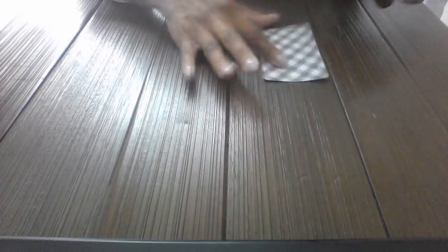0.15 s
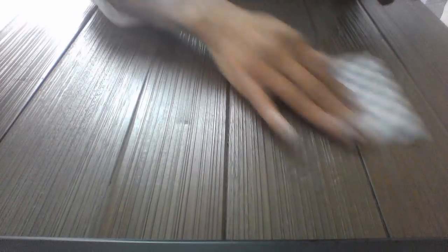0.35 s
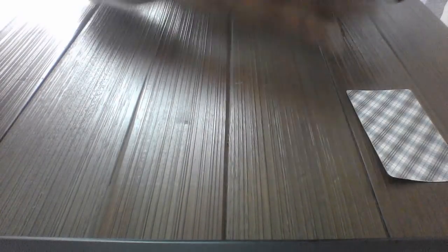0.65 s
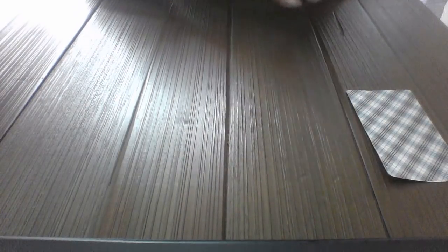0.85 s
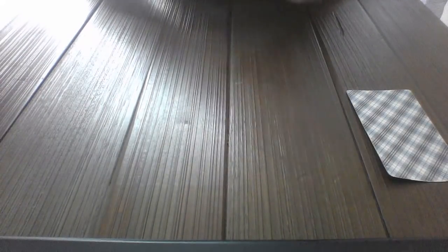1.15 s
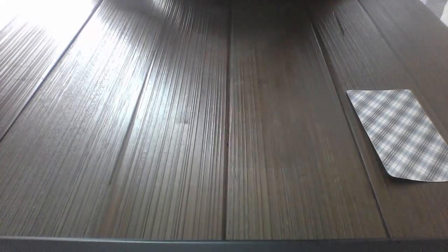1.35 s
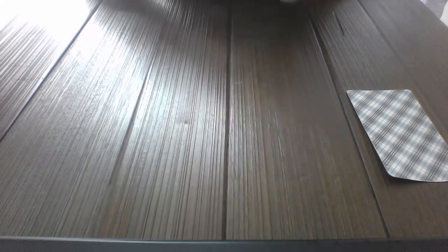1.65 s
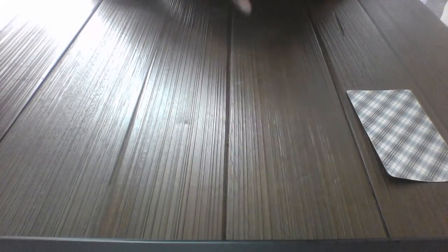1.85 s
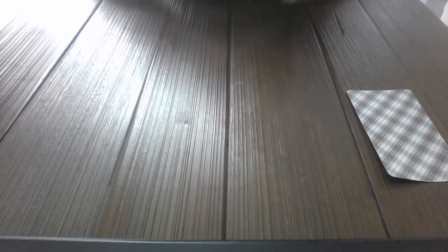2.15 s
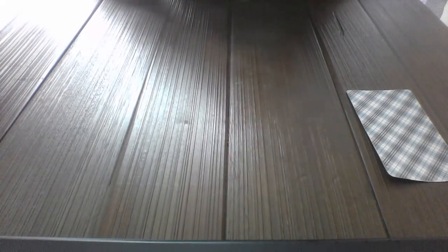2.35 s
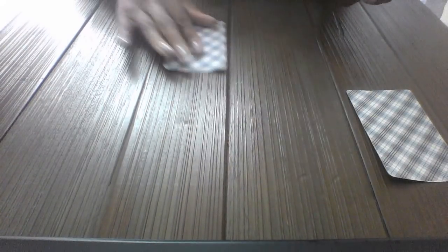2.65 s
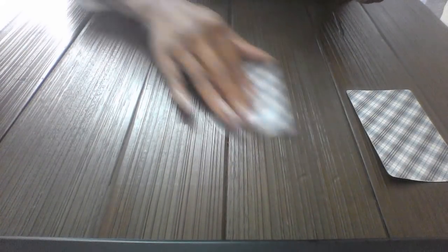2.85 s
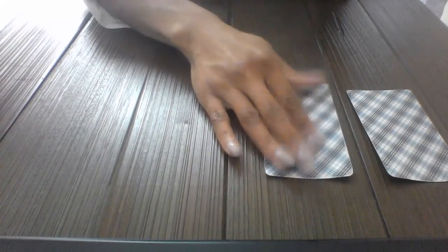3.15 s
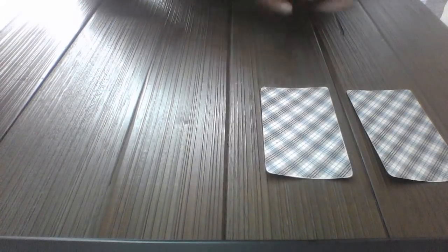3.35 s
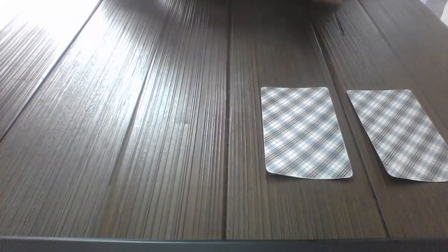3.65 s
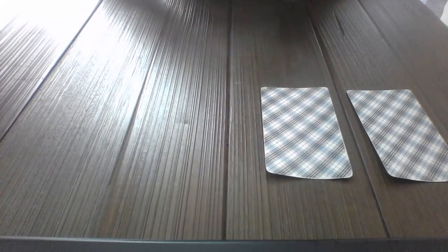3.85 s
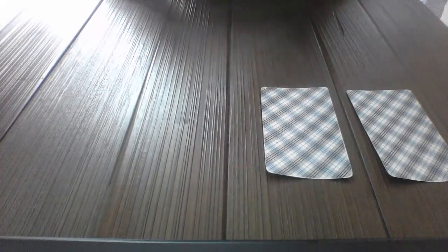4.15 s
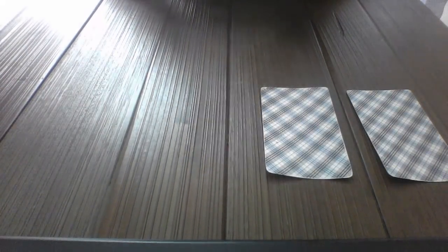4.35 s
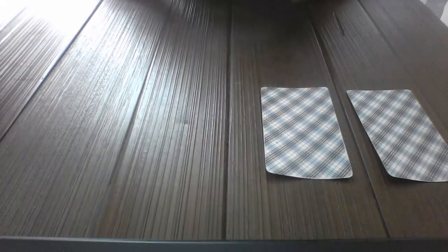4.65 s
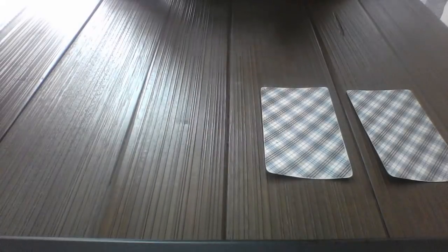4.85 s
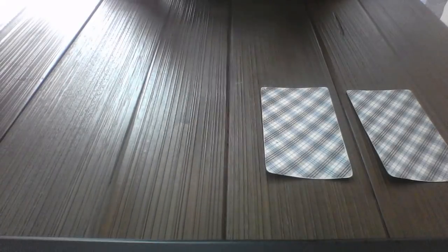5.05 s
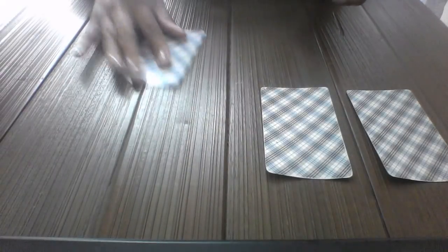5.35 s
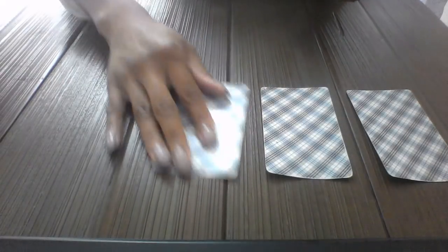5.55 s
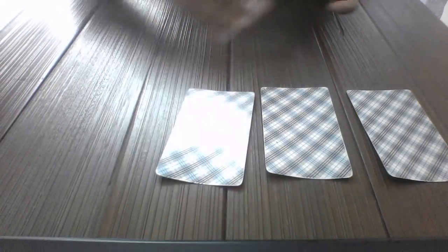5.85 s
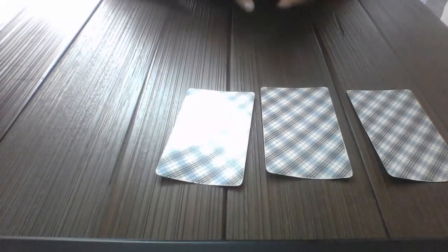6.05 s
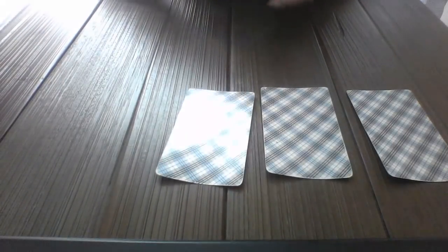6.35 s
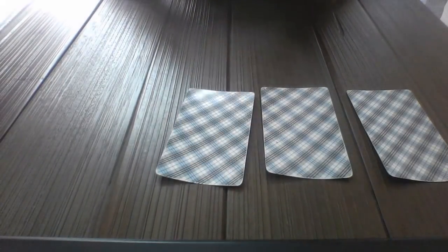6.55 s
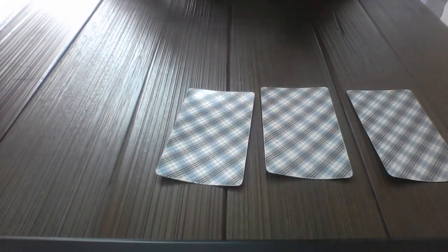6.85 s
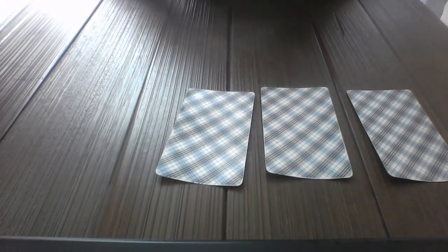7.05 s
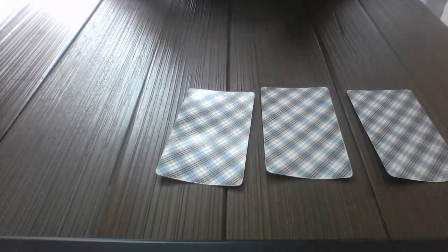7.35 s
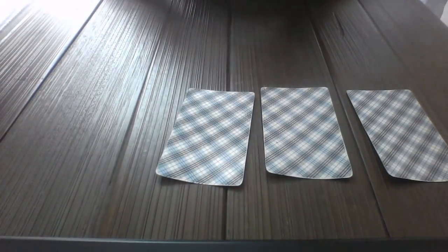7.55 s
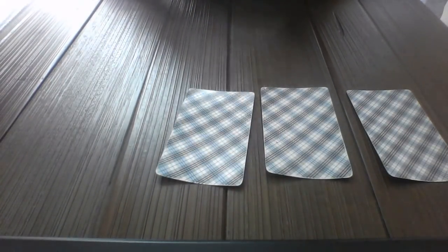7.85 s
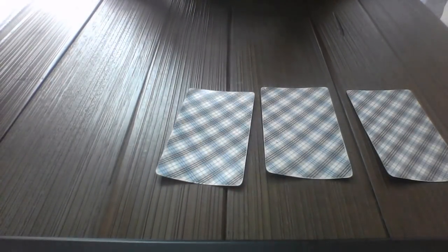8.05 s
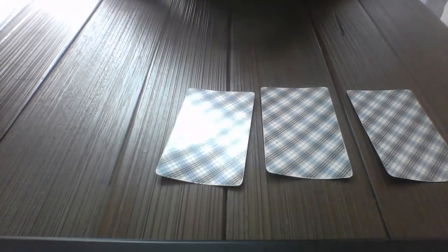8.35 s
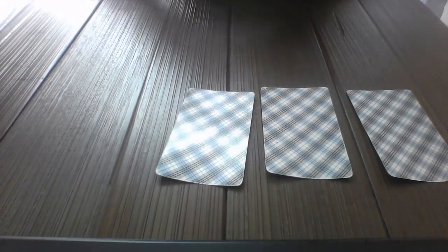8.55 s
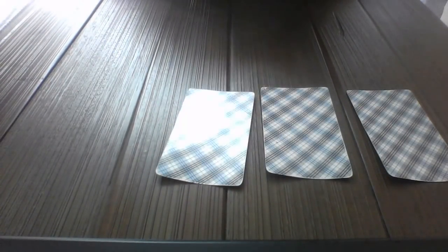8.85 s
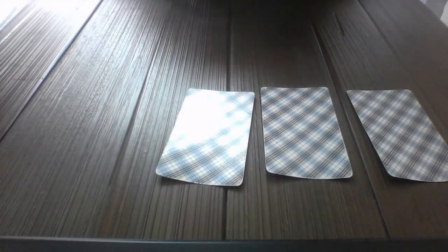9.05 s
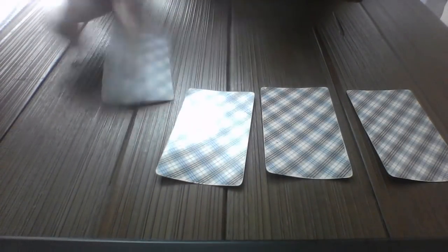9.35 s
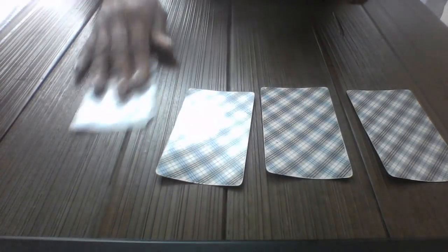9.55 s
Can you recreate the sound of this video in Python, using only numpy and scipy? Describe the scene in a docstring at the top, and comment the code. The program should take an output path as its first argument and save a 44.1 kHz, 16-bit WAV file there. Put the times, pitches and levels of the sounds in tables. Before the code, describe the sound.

A deck is shuffled by hand close to a microphone on the same table. Irregular packet clacks and brief dry rubs alternate with four deals: a sharp snap, a woody thump, then a quick airy hiss and scrape across the grain. A faint low drone, swelling table rumble and short room echo surround the cards; levels dip briefly after the loudest hits.

```python
"""A small room with a wooden table: a deck of cards is shuffled overhand just above the wood.
Cards rub as filtered slip noise; packets clack together as short flurries of edge noise through a hollow ring.
Four times a card is snapped off the deck, pressed down and slid across the wood with a hiss and a scrape.
Finger thumps ring the table's low modes, and its slow rocking is a swelling rumble under a steady room tone.
The microphone stands on the same table; its level ducks after the loudest hits and then recovers."""
import sys
import numpy as np
from scipy import signal
from scipy.fft import rfft, irfft, next_fast_len
from scipy.io import wavfile
from scipy.ndimage import uniform_filter1d

SR = 44100
rng = np.random.default_rng(int(sys.argv[2]) if len(sys.argv) > 2 else 0)


def dump(signal):
    """Clip the signal to [-1, 1] and save it as 16-bit WAV at the path in sys.argv[1]."""
    limited = np.clip(np.atleast_2d(signal).T, -1, 1)
    pcm = np.round(limited * 32767).astype(np.int16)
    wavfile.write(sys.argv[1], SR, pcm)


N = 427329  # samples

# Room tone. Each row: frequency in Hz, relative level in dB.
ROOM_TONE_COLOUR = [(20,-30),(60,1),(120,-5.5),(250,-3.5),(340,-14.5),(480,-18.5),(800,-26),(1200,-16),(1800,-27),(3000,-26.5),(5000,-28),(15500,-30)]
# Resonances of the drone in the room tone. Each row: centre in Hz, width in Hz, relative level in dB.
DRONE_RESONANCES = [(117.4,5.6,7.5),(202,36,-6.5),(300,14.3,-1),(374.5,17,-9.5),(622,43,-10.5),(1246,36,-11.5),(1588,9,-10),(2874,100,-21)]
# Decay of the room's echo. Each row: frequency in Hz, t60 in seconds.
ROOM_DECAY = [(150,0.62),(700,0.39),(1600,0.3),(2600,0.32),(5000,0.24),(10000,0.24),(16000,0.34)]
# Slow rocking of the table under the arms. Each row: time in seconds, relative level in dB.
ROCKING_LEVELS = [(0, -21.5), (0.6, -30), (1.25, -23.5), (1.65, -33), (2.45, -26), (2.9, -32.3), (3.8, -24),
                  (4.5, -27.6), (5.75, -28.5), (6.15, -24.5), (7.0, -26.5), (7.8, -23), (8.35, -25.5),
                  (8.75, -29), (9.35, -18.5), (9.69, -18.5)]
# Colour of the rocking. Each row: frequency in Hz, relative level in dB.
RUMBLE_COLOUR = [(8,-11),(18,0.5),(27,-14.5),(35,-5.5),(48,-35),(80,-32.5),(200,-63)]
# Fingers landing on the table. Each row: start in seconds, relative level in dB.
FINGER_THUMPS = [(.127,-16),(0.164,-22),(.251,-18),(0.279,-22),(0.371,-27),(2.559,-12),(5.244,-10),(9.18,-21),(9.502,-9),(9.525,-25)]
# Modes of the table top. Each row: frequency in Hz, average relative level in dB, t60 in seconds.
TABLE_MODES = [(128.6,-11.5,0.26),(168,-0.5,0.16),(199,1,0.18),(250,-10,0.16)]
# A dealt card snapping off the deck, slapping the table and catching on it. Each row: start in seconds,
# relative level in dB, relative thud in dB, relative crispness in dB, ring in Hz, t60 below the treble in seconds.
CARD_SNAPS = [(.105, -26.5, -4, -17, 1280, 0.058), (.125, -18, 6.5, 10, 4440, .013),
              (.134, -27, 7, 5, 1240, 0.018), (.361, -28, 6, 11, 2550, 0.04),
              (2.528, -14.5, 3.5, -27, 1040, 0.034), (2.553, -18, -6, -10, 3650, 0.044),
              (2.56, -12.5, 0, 3.5, 1380, 0.02), (2.565, -11.5, -7, -21, 1430, 0.021),
              (2.573, -18, 8, 3, 1450, 0.028), (2.582, -16.5, 10, 11, 1400, 0.017),
              (5.204, -18, 3.5, -18, 2200, 0.038), (5.222, -19, -8, -7, 1200, 0.032),
              (5.227, -12, 6, -9, 1350, 0.065), (5.241, -21.5, -5, 9, 1380, 0.026),
              (5.246, -11.5, 7.5, -1, 5270, 0.0087), (5.37, -31.5, -3, 42, 9000, 0.068),
              (9.5, -21, 6, 12, 2380, 0.029), (9.506, -29.5, 15, 23, 4000, 0.046),
              (9.521, -23.5, 13, 22, 3400, 0.018)]
# A card pushed over the wood. Each row: moment of top speed in seconds, speeding up in seconds,
# slowing down in seconds, hiss at top speed in dB, scrape at top speed in dB.
CARD_SLIDES = [(.365, 0.17, .11, -33.5, -31), (2.9, 0.23, 0.11, -31.5, -34), (5.5, 0.19, .12, -31, -38.5),
               (9.6, 0.12, .25, -33.5, -37)]
# Hiss of a card on the wood grain. Each row: frequency in Hz, relative level in dB.
SLIDE_HISS_COLOUR = [(500,-27.5),(3000,-24),(5000,-5.5),(7000,0),(11000,0),(15500,-4.5)]
# Lower scrape under finger pressure. Each row: frequency in Hz, relative level in dB.
SLIDE_SCRAPE_COLOUR = [(200,-19),(450,-1),(750,-7.5),(1400,1.5),(1750,-5.5),(2350,2),(2750,-2.5),(3400,0),(5000,-0.5),(8000,-3.5),(15000,-14)]
# Packets meeting in the hands. Each row: start in seconds, relative level in dB, relative thud in dB,
# relative crispness in dB, ring in Hz, t60 below the treble in seconds.
PACKET_CLACKS = [(.754, -35.5, 4, -13, 2870, 0.015), (.963, -31, 0, -11, 2100, 0.055),
                 (.983, -24, 8, 1, 1190, 0.012), (.989, -24.5, 20, -16, 1230, 0.012),
                 (1.013, -28.5, 18, 7, 1200, 0.029), (1.159, -20, 2, -9, 1220, 0.023),
                 (1.165, -18.5, -2, -12, 1100, 0.047), (1.173, -18.5, 3, -6, 1200, 0.024),
                 (1.194, -25, -3, -3, 3110, .026), (1.221, -24.5, 6, -14, 930, .031),
                 (1.231, -22, 0, -9, 1070, 0.05), (1.394, -30.5, 2, -6, 1210, 0.032),
                 (1.433, -27, 16, 6, 940, 0.065), (1.479, -24, -1, -3.5, 1250, 0.022),
                 (1.629, -11.5, 1, 0.5, 1430, 0.016), (1.636, -13, -1, -8, 1870, 0.023),
                 (1.879, -30, 7, -11, 1120, .039), (1.894, -33.5, 19, 0, 935, .024),
                 (1.916, -23.5, 23, 8, 950, 0.016), (1.943, -31, -8, -1, 5000, 0.031),
                 (2.112, -27.5, 7, -1, 970, .045), (2.166, -21, 8, -11, 1250, .033),
                 (2.322, -31.5, -1, -8, 2020, 0.014), (2.333, -23.5, -3.5, -10, 1180, 0.017),
                 (2.353, -28.5, 14, 7, 2870, .03), (2.377, -28, 9, 17, 1110, 0.014),
                 (2.385, -12.5, 1, -25, 1330, 0.013), (3.582, -28, 5, -2, 1310, .042),
                 (3.591, -28.5, 13, 10, 1320, 0.023), (3.753, -29.5, 3, -3, 2660, 0.022),
                 (3.781, -13, 8, 3.5, 1740, 0.015), (3.792, -18, -8, -2, 2160, 0.053),
                 (3.852, -22, 9.5, -5, 1090, 0.025), (4.038, -24.5, 22, 0, 1680, 0.029),
                 (4.109, -37, 3, -1, 1300, .022), (4.247, -17, 6.5, 0, 1580, 0.029),
                 (4.254, -21, -13, -3, 2820, 0.028), (4.302, -29, 15, -7, 940, 0.047),
                 (4.312, -26.5, 9, -14, 1200, 0.034), (4.46, -31, 5, -4, 3100, 0.052),
                 (4.478, -27, 7, 2, 1220, .025), (4.528, -30.5, 1, 6, 1110, 0.033),
                 (4.557, -26, 6, -3, 3400, 0.039), (4.705, -32, 2, 6, 1200, .037),
                 (4.72, -22, -15, -5, 4330, 0.016), (4.784, -25, 10, -23, 1740, 0.019),
                 (4.79, -18.5, -1.5, -13, 2860, 0.052), (4.94, -29, 7, -8, 5000, 0.04),
                 (4.991, -28, 6, -3, 1150, 0.018), (5.027, -25, 5, -4, 1300, 0.022),
                 (5.931, -34, -13, -12, 1110, 0.076), (6.134, -28, 7, 0, 1190, 0.027),
                 (6.151, -21, 3, -8, 1290, 0.073), (6.163, -25, 0, -1, 1190, 0.041),
                 (6.356, -14, -3, -3, 4250, 0.028), (6.429, -29.5, 1, 0, 3600, .021),
                 (6.455, -21, 9.5, 13, 3340, 0.022), (6.461, -22, -15, 7, 1140, 0.01),
                 (6.468, -18.5, -7.5, -1, 1160, 0.036), (6.487, -29, -3, 6, 3640, 0.016),
                 (6.492, -19.5, -9, 8, 1230, 0.027), (6.717, -24.5, -2, -11, 4000, 0.039),
                 (6.725, -20.5, 7, -0.5, 3740, 0.06), (6.788, -25, 7, 1, 1270, .05),
                 (6.8, -17, 3.5, -20, 1310, 0.034), (6.806, -18.5, 3, 0.5, 1360, 0.038),
                 (6.971, -29, -2, -11, 4100, 0.037), (7.064, -22.5, 6, -9.5, 1320, 0.024),
                 (7.205, -22.5, -5, 3, 1110, 0.03), (7.213, -17.5, -3, -3, 1210, .026),
                 (7.226, -22.5, -5, 2, 3900, 0.035), (7.273, -23.5, 5, -0.5, 1000, 0.022),
                 (7.423, -23, 4.5, 4, 1980, 0.01), (7.549, -26, 19, 0, 925, 0.034),
                 (7.694, -32, 10, -10, 1190, .046), (7.757, -22.5, -4, -11, 1170, 0.033),
                 (7.925, -30, 1, -2, 4270, 0.058), (8.005, -33.5, 1, 6, 1300, 0.067),
                 (8.022, -28, 8, -4, 5000, 0.058), (8.169, -18.5, -8, -3, 3100, 0.0096),
                 (8.173, -23, -3, 5, 1670, 0.044), (8.235, -27.5, 4, -15, 1290, 0.02),
                 (8.434, -24, 5, 6.5, 1050, 0.023), (8.441, -24.5, 6, 6, 1310, 0.014),
                 (9.145, -38, 1, 2, 2640, .024), (9.156, -26.5, 20, 1, 2400, 0.019),
                 (9.187, -34, 22, -9, 500, .056), (9.359, -19.5, -5, -5, 3200, 0.024),
                 (9.365, -16, 2, -13, 2880, 0.049), (9.392, -21.5, 11.5, 9, 960, 0.02),
                 (9.428, -29.5, 11, 16, 2660, 0.058)]
# Basic colour of clacks and snaps. Each row: frequency in Hz, relative level in dB.
BLOW_COLOUR = [(60,-7.5),(150,-7.5),(400,-2.5),(750,-7.5),(1300,-2),(2300,-3.5),(5000,-7.5),(9000,-17.5),(15500,-24.5)]
# Overhand strokes, about four a second. Each row: start in seconds, length in seconds,
# relative rub in dB as the packet is drawn, relative rub in dB as it drops back.
SHUFFLE_STROKES = [(.76, 0.035, -46, -41), (0.924, .085, -36, -38.5), (1.172, 0.064, -37, -35.5),
                   (1.391, .09, -38, -32.5), (1.843, 0.097, -33, -34.5), (2.104, 0.082, -36, -41.5),
                   (2.325, 0.065, -38, -32), (3.369, 0.057, -42.5, -40.5), (3.489, 0.08, -42.5, -36),
                   (3.752, 0.13, -39, -40), (3.995, 0.098, -43.5, -32), (4.261, 0.047, -39, -34),
                   (4.459, 0.12, -37, -37), (4.688, 0.092, -35, -32), (4.936, 0.022, -41, -33),
                   (5.004, 0.027, -27, -28), (6.102, 0.1, -37.5, -33), (6.33, 0.048, -33.5, -37),
                   (6.419, 0.052, -34, -43), (6.695, 0.097, -35.5, -38), (6.969, 0.095, -33, -35.5),
                   (7.217, 0.048, -30, -35), (7.425, .13, -36, -30.5), (7.691, 0.065, -33, -37.5),
                   (7.93, 0.012, -37, -38), (7.968, 0.05, -34, -29.5), (8.174, 0.077, -31, -40),
                   (8.38, 0.047, -38, -42), (8.725, 0.082, -49, -42.5), (9.047, 0.12, -44.5, -36)]
# Colour of card rubbing on card. Each row: frequency in Hz, relative level in dB.
CARD_RUB_COLOUR = [(100,-11),(300,5),(800,-1.5),(1250,4.5),(1800,-4.5),(2400,0.5),(5000,-4.5),(8000,-10),(15500,-15.5)]

TOP_HZ = 15950  # nothing is heard above this
GRIP_S, LET_GO_S, EASE_DB = 0.014, 0.013, 2.5  # a rub's attack and release; the grip eases in mid-stroke
HISS_GROWS, SCRAPE_GROWS = 1.0, 1.2  # amplitude as a power of the card's speed
# Cupped hands ring best at HOLLOW_HZ; each octave away the ring is weaker (dB) and wider (fraction)
HOLLOW_HZ, RING_LOSS_DB, RING_WIDENS = 1330, 3.5, 0.6


def amp(db):
    """Decibels to gain."""
    return 10 ** (np.asarray(db) / 20)


def unit(x):
    """Scale to rms 1."""
    return x / np.sqrt(np.mean(x ** 2) + 1e-20)


def along(points, hz):
    """Read (Hz, value) points on a log frequency axis."""
    point_hz, values = np.transpose(points)
    return np.interp(np.log(hz + 1), np.log(point_hz + 1), values)


def filtered(x, response):
    """Filter x by a response given as a function of frequency."""
    size = next_fast_len(N + 8192)
    spectrum = rfft(x, size) * response(np.fft.rfftfreq(size, 1 / SR))
    return irfft(spectrum, size)[:N]


def noise(colour):
    """Noise of rms 1 with the given spectrum."""
    return unit(filtered(rng.standard_normal(N), lambda hz: amp(along(colour, hz))))


def wobble(rate):
    """A random curve with rate knots a second."""
    return np.interp(np.arange(N) * rate / SR, np.arange(N), rng.standard_normal(N))


def add(track, s, sound):
    """Mix a sound into the track at time s."""
    part = track[max(0, round(s * SR)):][:len(sound)]
    part += sound[:len(part)]


def causal(gain):
    """The minimum-phase response with this gain, so that a blow starts sharply."""
    cepstrum = irfft(np.log(gain + 1e-6))
    half = len(cepstrum) // 2
    cepstrum[1:half] *= 2
    cepstrum[half + 1:] = 0
    return np.exp(rfft(cepstrum))


def room_tone():
    """A steady noise bed with a faint drone: noise through a few resonances."""
    def resonances(hz):
        return sum(amp(db) * 1j * hz * width / (centre * centre - hz * hz + 1j * hz * width)
                   for centre, width, db in DRONE_RESONANCES)

    drone = unit(filtered(rng.standard_normal(N), resonances))
    return amp(-43) * noise(ROOM_TONE_COLOUR) + amp(-46) * drone


def table():
    """Soft fingers ring the low modes of the table top, and the whole table rocks slowly."""
    thumps, t = np.zeros(N), np.arange(SR // 3) / SR
    for s, db in FINGER_THUMPS:
        ring = np.zeros(len(t))
        for hz, level, t60 in TABLE_MODES:
            mode_db = level + rng.normal(0, 3.7)  # each thump excites the modes differently
            ring += amp(mode_db - 60 * t / t60) * np.sin(2 * np.pi * hz * t)
        soft_onset = 1 - np.exp(-t / 0.011)
        add(thumps, s, amp(db - 6.5) * ring * soft_onset)
    rocking_db = np.interp(np.arange(N) / SR, *np.transpose(ROCKING_LEVELS)) - 1.0
    return thumps + amp(rocking_db) * noise(RUMBLE_COLOUR)


def room_tail(size=16384):
    """Diffuse echo of energy 1: noise that swells briefly, then dies at a rate set by frequency."""
    hz, t, bands = signal.stft(rng.standard_normal(size), SR, nperseg=256)
    decay = amp(-60 * t / along(ROOM_DECAY, hz)[:, None])
    tail = signal.istft(bands * decay, SR, nperseg=256)[1]
    tail *= 1 - np.exp(-(np.arange(len(tail)) / SR / 0.0031) ** 2)
    return tail / np.linalg.norm(tail)


def impacts(rows, level_db, thud_db, crisp_db, ring_db, ring_width, rise, treble_life, grain_db, wet_db,
            size=4096):
    """Each blow is a flurry of card edges that swells and dies, coloured by the deck and the hollow of the hand."""
    track, t, hz = np.zeros(N), np.arange(size) / SR, np.fft.rfftfreq(size, 1 / SR)
    low = 1 / (1 + (hz / 750) ** 4)
    high = 1 - 1 / (1 + (hz / 4500) ** 3)
    for s, db, thud, crisp, ring_hz, t60 in rows:
        age = t / max(t60, 0.004)  # time as a share of the decay
        grain = np.repeat(rng.standard_normal(size), 16)[:size]  # strength steps every 16 samples
        edges = rng.standard_normal(size) * amp(grain_db * grain)

        def flurry(life):
            swell = 1 - np.exp(-life / rise)
            return rfft(unit(edges * swell * amp(-60 * life)))

        # the first edges to land are the hardest, so the treble dies sooner
        contact = (1 - high) * flurry(age) + high * flurry(age / treble_life)
        octaves = abs(np.log2(ring_hz / HOLLOW_HZ))
        width = ring_width * ring_hz * (1 + RING_WIDENS * octaves)
        ring = (ring_db - RING_LOSS_DB * octaves) / (1 + ((hz - ring_hz) / width) ** 2)
        colour = along(BLOW_COLOUR, hz) + low * (thud + thud_db) + high * (crisp + crisp_db) + ring
        blow = amp(db + level_db) * unit(irfft(contact * causal(amp(colour))))
        add(track, s, blow)
        add(track, s, amp(wet_db) * signal.fftconvolve(blow, room_tail()))
    return track


def friction(colour, grain_db, catch_db, tick_rate, tick_db, patchy_db=2.5):
    """Sliding card: fine slips whose strength varies as surfaces catch, and stray ticks of an edge letting go."""
    slips = rng.standard_normal(N) * amp(grain_db * wobble(2500) + catch_db * wobble(170))
    releases = (rng.random(N) < tick_rate / SR) * rng.uniform(0.1, 1, N)
    tick_decay = np.exp(-1 / (0.00068 * SR))
    ticks = signal.lfilter([1], [1, -tick_decay], releases) * rng.standard_normal(N)
    bands = signal.stft(unit(slips) + amp(tick_db) * ticks, nperseg=256)[2]
    # the card's resonances shift as it bends: smooth random patches over pitch and time
    patches = uniform_filter1d(rng.standard_normal(bands.shape), size=4, axis=0)
    patches = unit(uniform_filter1d(patches, size=7, axis=1))
    shifting = signal.istft(bands * amp(patchy_db * patches), nperseg=256)[1][:N]
    return unit(filtered(shifting, lambda hz: amp(along(colour, hz))))


def dealing():
    """A card snaps down, then hisses over the wood grain as it speeds up and stops; pressure adds a lower scrape."""
    t, hiss, scrape = np.arange(N) / SR, np.zeros(N), np.zeros(N)
    for s, speeding, slowing, hiss_db, scrape_db in CARD_SLIDES:
        speed = np.sin(np.pi / 2 * np.interp(t - s, [-speeding, 0, slowing], [0, 1, 0]))
        hiss += amp(hiss_db) * speed ** HISS_GROWS
        scrape += amp(scrape_db) * speed ** SCRAPE_GROWS
    hiss *= friction(SLIDE_HISS_COLOUR, grain_db=-0.5, catch_db=1.0, tick_rate=46, tick_db=17)
    scrape *= friction(SLIDE_SCRAPE_COLOUR, grain_db=-0.5, catch_db=3.5, tick_rate=70, tick_db=0)
    snaps = impacts(CARD_SNAPS, level_db=-6.5, thud_db=-1, crisp_db=3.5, ring_db=11.5, ring_width=0.081,
                    rise=0.036, treble_life=0.94, grain_db=2.5, wet_db=-11.5)
    return hiss + scrape + snaps


def rubbing():
    """In each stroke the cards grip, run more lightly, grip again and let go."""
    t, gain = np.arange(N) / SR, np.zeros(N)
    for s, length, draw_db, drop_db in SHUFFLE_STROKES:
        done = np.clip((t - s) / length, 0, 1)
        touch = np.interp(t, [s - GRIP_S, s, s + length, s + length + LET_GO_S], [0, 1, 1, 0])
        stroke_db = draw_db + (drop_db - draw_db) * done - EASE_DB * np.sin(np.pi * done)
        gain += touch ** 2 * amp(stroke_db)
    texture = friction(CARD_RUB_COLOUR, grain_db=4, catch_db=4.0, tick_rate=45, tick_db=14)
    rub = amp(1.0) * gain * texture
    return rub + amp(-7.5) * signal.fftconvolve(rub, room_tail())[:N]


def shuffling():
    """Packets are drawn off the deck with a rub and dropped back with a clack."""
    clacks = impacts(PACKET_CLACKS, level_db=-10.5, thud_db=1.5, crisp_db=1, ring_db=11.5, ring_width=0.089,
                     rise=0.1, treble_life=0.49, grain_db=5, wet_db=-9.0)
    return rubbing() + clacks


def scene():
    """Room, table and cards at one microphone."""
    return (room_tone() + table() + dealing() + shuffling())[None]


def limited(x, threshold_db, release_db):
    """Loud bursts pull the gain down; it recovers at release_db a second."""
    power = signal.lfilter(*signal.butter(1, 25, fs=SR), x ** 2)
    over = np.maximum(10 * np.log10(np.abs(power) + 1e-12) - threshold_db, 0)
    ramp = release_db * np.arange(N) / SR
    reduction_db = np.maximum.accumulate(over + ramp) - ramp  # held peak, sliding back down
    return x * amp(-reduction_db)


def record(dry):
    """Gain control, soft overload and a band limit at the microphone."""
    x = limited(dry[0], threshold_db=-13, release_db=21)
    x = x / (1 + x ** 4) ** (1 / 4)  # peaks bend smoothly towards full scale
    return filtered(x, lambda hz: hz < TOP_HZ)[None]


dry = scene()
out = record(dry)
dump(out)
```